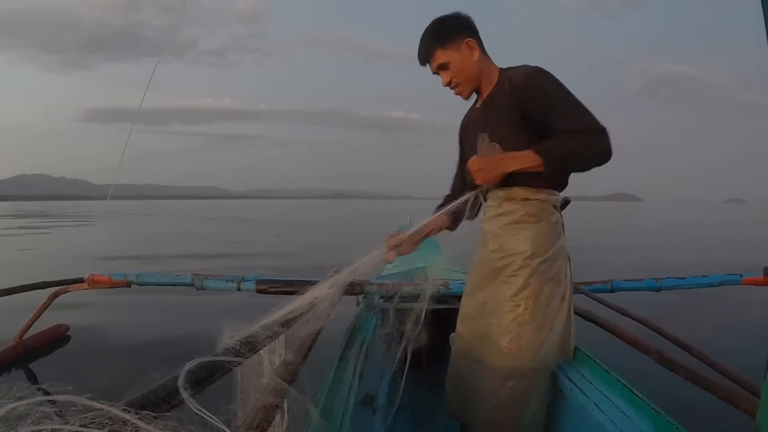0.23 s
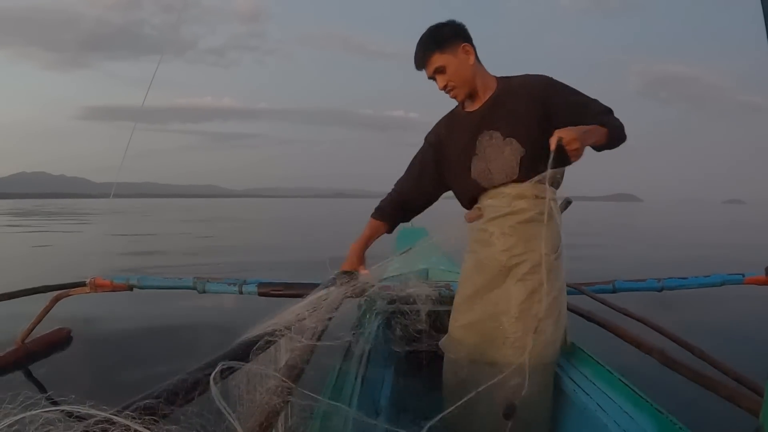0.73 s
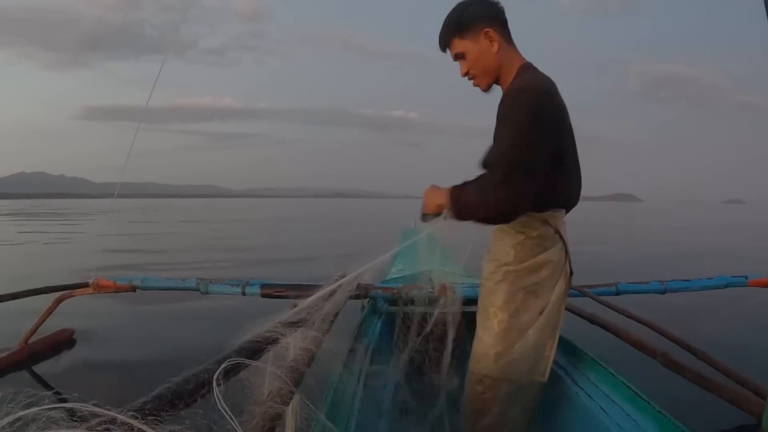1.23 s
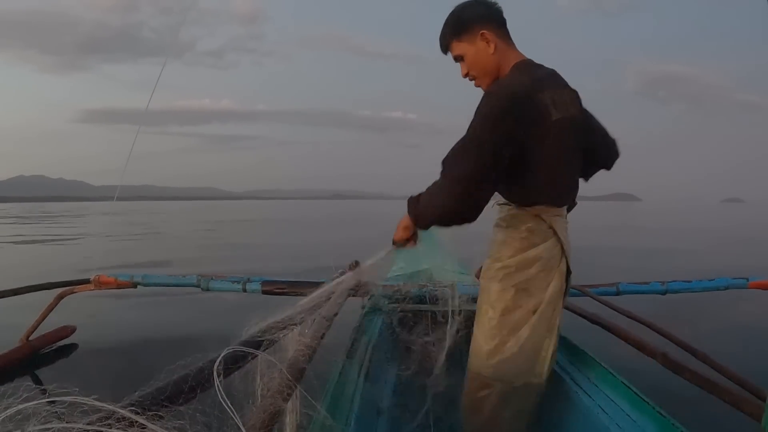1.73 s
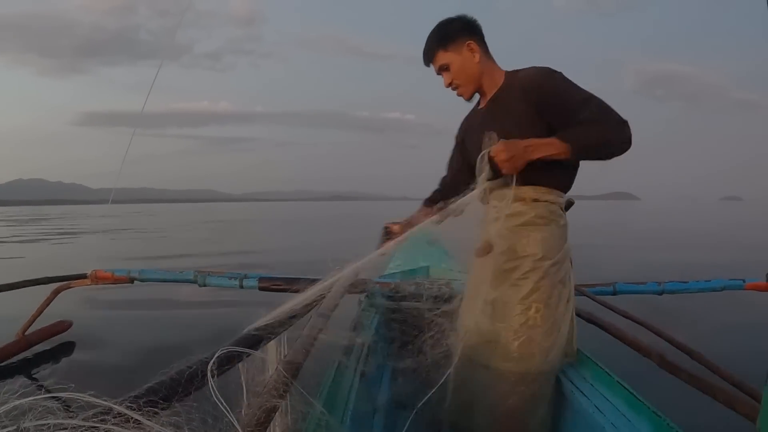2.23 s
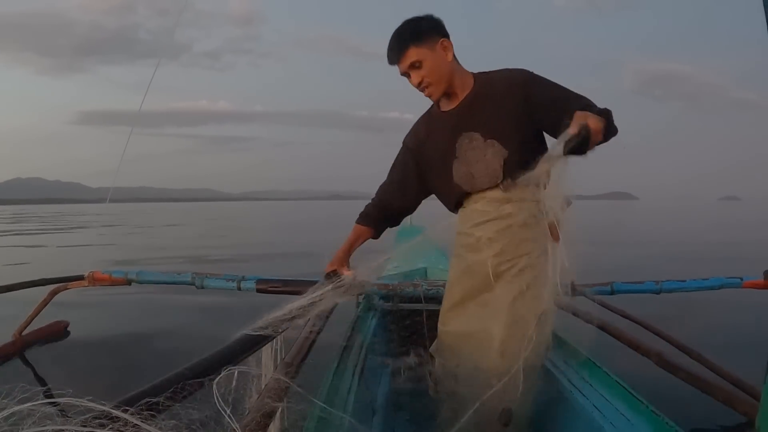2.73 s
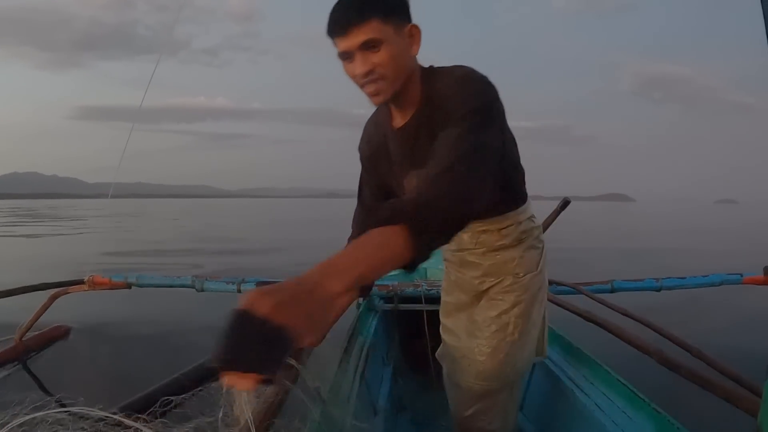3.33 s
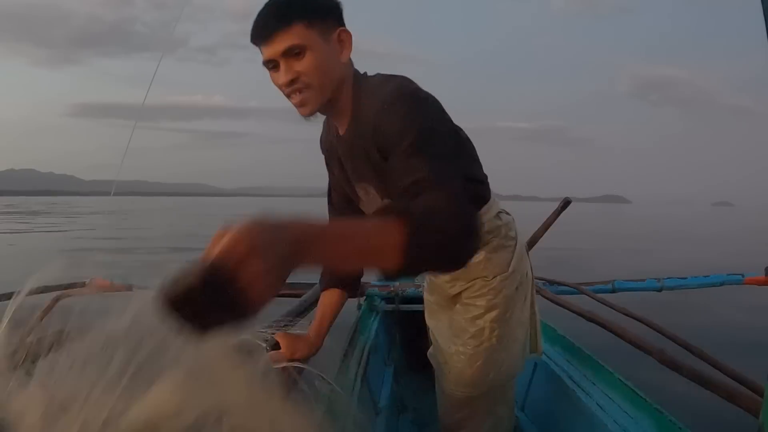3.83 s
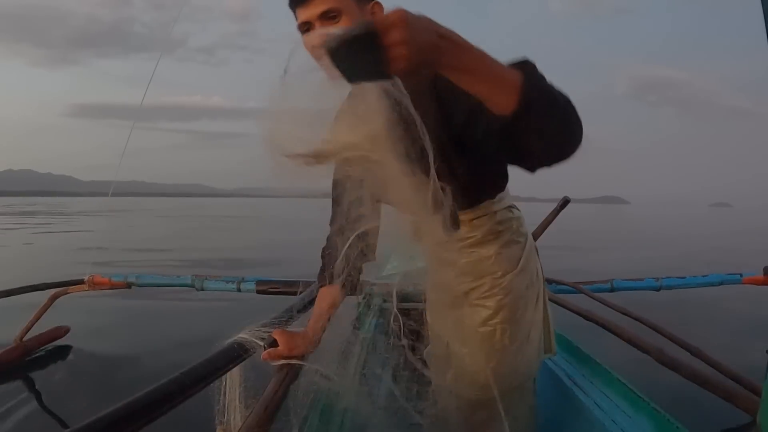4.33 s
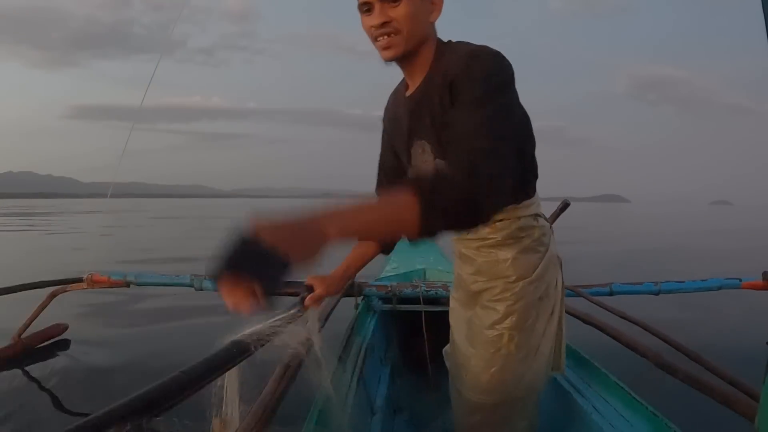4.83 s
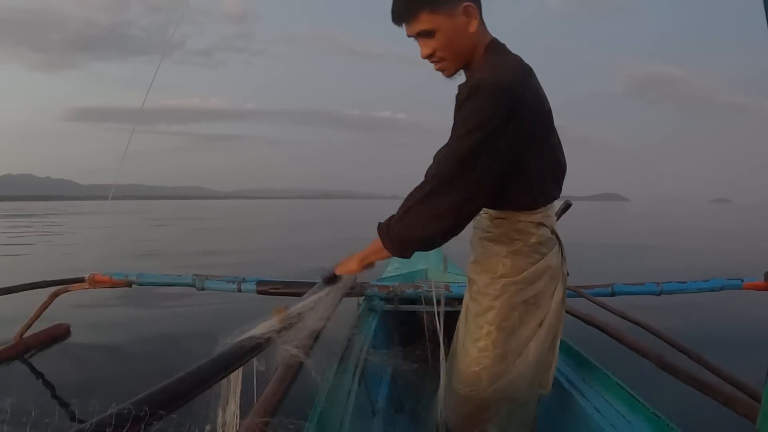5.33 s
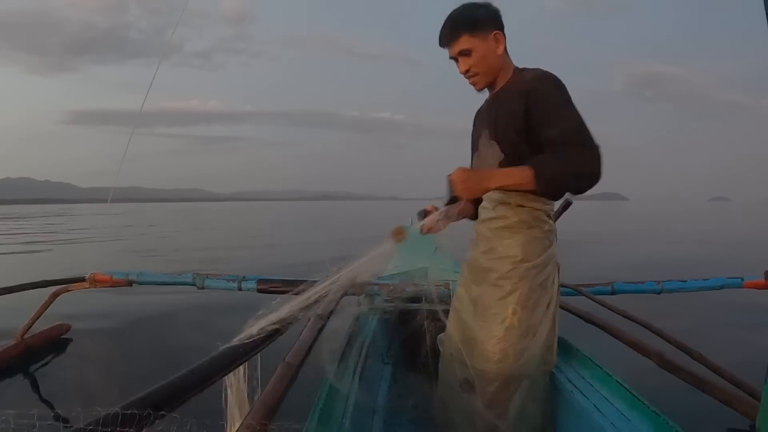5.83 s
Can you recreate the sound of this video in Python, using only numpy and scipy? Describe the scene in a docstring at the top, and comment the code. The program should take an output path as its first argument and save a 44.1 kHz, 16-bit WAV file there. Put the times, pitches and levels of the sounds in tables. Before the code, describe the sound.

Hand-hauled wet netting crackles and scrapes over a hollow hull, water trickling off it in tiny plinks. Early wooden knocks and a booming load give way to drips, rough little zips of taut strands and softer bumps. After a brief quiet lull, water runs again, the line judders over the side, and a bright splash of droplets meets a last knock. Outdoors, close microphone, central sound, dark rumble beneath.

```python
"""Hauling a wet net

A wet gill net is hauled hand over hand into a small wooden boat, over a low rumble of dark noise.
Filtered grains make the mesh rustle, drag and fizz; sprays, bubbles and short pings make the water.
Zips are rough bands of noise; knocks and thuds are noise bursts and tones that ring the hull's modes."""
import sys
import numpy as np
from scipy import signal
from scipy.fft import rfft, irfft, next_fast_len
from scipy.io import wavfile
from scipy.ndimage import uniform_filter1d

SR = 44100
rng = np.random.default_rng(int(sys.argv[2]) if len(sys.argv) > 2 else 0)


def transcribe(signal):
    """Save signal, clipped to [-1, 1], as a 16-bit WAV file at the path in sys.argv[1]."""
    frames = np.atleast_2d(signal).T
    limited = np.clip(frames, -1, 1)
    pcm = np.round(limited * 32767).astype(np.int16)
    wavfile.write(sys.argv[1], SR, pcm)


N = 268745
TIME = np.arange(N) / SR
AGE = TIME[:SR // 2]   # seconds since a contact


def from_db(db):
    """Level in dB to an amplitude factor."""
    return 10 ** (np.asarray(db) / 20)


def rms_one(x):
    """Scale to an rms of 1."""
    return x / np.sqrt(np.mean(x ** 2) + 1e-20)


def peak_one(x):
    """Scale to a peak of 1."""
    return x / (np.abs(x).max() + 1e-20)


def in_time(rows):
    """The columns of a curve table at every sample."""
    s, *columns = np.transpose(rows)
    return [np.interp(TIME, s, column) for column in columns]


def add(out, s, sound):
    """Mix a sound in at a time."""
    at = max(0, round(s * SR))
    out[at:at + len(sound)] += sound[:N - at]


def dying(t60):
    """Exponential decay that falls 60 dB in t60 seconds."""
    return from_db(-60 * AGE / t60)


def swell(length):
    """A quick rise and a longer fall, mostly over after the given length in seconds."""
    u = 4 * AGE / max(length, .001)
    return u * np.exp(1 - u)


def drift(rate):
    """Smooth chance with spread 1: random knots, rate of them per second, joined by lines."""
    knots = np.arange(int(N / SR * rate) + 2)
    return rms_one(np.interp(TIME * rate, knots, rng.standard_normal(len(knots))))


def coloured(x, spectrum, size=8192):
    """Causal (minimum-phase) filter with the given spectrum."""
    hz, db = np.transpose(spectrum)
    grid = np.maximum(np.arange(size // 2 + 1) * SR / size, 1)
    curve_db = np.interp(np.log(grid), np.log(hz), db)
    cepstrum = irfft(np.log(from_db(curve_db)))
    # fold the cepstrum forward in time to get minimum phase
    cepstrum[1:size // 2] *= 2
    cepstrum[size // 2 + 1:] = 0
    impulse = irfft(np.exp(rfft(cepstrum)))
    return signal.fftconvolve(x, impulse)[:len(x)]


def grains(per_s, spread_db):
    """Random clicks of uneven size; rms 1."""
    sizes = from_db(spread_db * np.minimum(rng.exponential(1, N), 4))
    signs = rng.choice([-1, 1], N)
    return rms_one(sizes * signs * (rng.random(N) < per_s / SR))


def pings(per_s, low_hz, high_hz, cycles, spread_db):
    """Short rings at random moments and pitches, of nearly equal strength; 60 dB down in so many cycles."""
    out, age = np.zeros(N), AGE[:SR // 20]
    for when, smallness, chance in rng.random((int(per_s * TIME[-1]), 3)):
        hz = low_hz * (high_hz / low_hz) ** smallness
        ping = np.sin(2 * np.pi * hz * age) * from_db(-60 * age * hz / cycles)
        add(out, when * TIME[-1], from_db(-spread_db * np.log(chance + .03)) * ping)
    return out


def patchy(x, depth_db, per_s, count=14):
    """Each third of an octave swells and sinks on its own, as different strands take their turn."""
    size = next_fast_len(N)
    spectrum = rfft(x, size)
    hz = np.maximum(np.arange(len(spectrum)) * SR / size, 1)
    place = np.clip(3 * np.log2(hz / 600), 0, count - 1)   # band number, counted up from 600 Hz
    out = np.zeros(N)
    for k in range(count):
        band = irfft(spectrum * np.maximum(1 - np.abs(place - k), 0), size)[:N]
        out += band * from_db(depth_db * drift(per_s))
    return rms_one(out)


# modes of the wooden hull: [f/Hz, level/dB, t60/s]
HULL_MODES = [(94.6, 1.5, 0.33), (235.2, 1, 0.34), (337.7, -8, 0.51), (476.7, -6, 0.27), (594, -5.5, 0.33),
              (717.6, 3.5, 0.31), (1091, -6, 0.1), (1155, 0.5, 0.26), (1398, 3.5, 0.14), (1530, -3, 0.13),
              (1999, 0, 0.12), (2427, -6, 0.1), (2946, -4, 0.15)]


def hull_ring(uneven_db=2.5):
    """The hull's answer to a tap; each spot excites the modes a little differently."""
    ring = np.zeros(len(AGE))
    for k, (hz, db, t60) in enumerate(HULL_MODES):
        strength = from_db(db + uneven_db * rng.standard_normal())
        ring += strength * (-1) ** k * np.sin(2 * np.pi * hz * AGE) * dying(t60)
    return ring


def through_hull(force):
    """The hull's modes ringing under a force."""
    return signal.fftconvolve(force, hull_ring())[:len(force)]


# swell of the low rumble, before trim: [t/s, level/dB]
RUMBLE_LEVEL = [(0.0, -40), (0.7, -43), (1.37, -35.5), (2.09, -38), (2.56, -44.5), (3.26, -38.5),
                (4.22, -43.5), (4.7, -41.5), (5.42, -38.5), (6.09, -42.5)]
# colour of the low rumble: [f/Hz, level/dB per Hz]
RUMBLE_COLOUR = [(12, -37), (25, -1), (45, -2.5), (70, 1), (94, 0), (125, -3), (160, -3.5), (218, -4),
                 (250, -21.5), (300, -22.5), (420, -29.5), (1500, -52)]


def rumble():
    """A dark, even rumble that swells and sinks slowly."""
    level_db, = in_time(RUMBLE_LEVEL)
    noise = rms_one(coloured(rng.standard_normal(N), RUMBLE_COLOUR))
    slow_power = uniform_filter1d(noise ** 2, SR // 8)
    even = noise / np.sqrt(slow_power)
    return from_db(level_db - 0.52) * even


# drops fall on the sea and trap a bubble, before tap and bubble are balanced: [t/s, level/dB, f/Hz]
DRIP_EVENTS = [(2.10, -42, 1790), (2.173, -38, 1240), (2.205, -41, 1296), (2.504, -42, 1630),
               (2.708, -38, 1580), (2.742, -48, 2300), (2.76, -41, 850), (2.778, -48, 2170),
               (3.531, -41.5, 2450), (4.105, -44, 1590), (4.227, -45, 490), (4.339, -45, 1230),
               (4.37, -41.5, 1880), (4.735, -43, 1180), (4.755, -44, 1330), (4.775, -43, 1920)]


def drips(t60=0.048, rise_per_s=4.8, onset_s=0.00035):
    """A tap on the surface, then a bubble whose pitch climbs as it rises."""
    out = np.zeros(N)
    for s, db, hz in DRIP_EVENTS:
        tone = np.sin(2 * np.pi * hz * AGE * (1 + rise_per_s * AGE / 2))
        bubble = tone * dying(t60) * (1 - np.exp(-AGE / onset_s))
        near_pitch = signal.butter(1, [.75 * hz, 1.4 * hz], "band", fs=SR, output="sos")
        burst = rng.standard_normal(len(AGE)) * dying(0.013)
        tap = peak_one(signal.sosfilt(near_pitch, burst))
        add(out, s, from_db(db) * (from_db(-1) * bubble + from_db(-4) * tap))
    return out


def trickle(water_db, rustle_db):
    """Tiny drops run off the mesh, larger ones plink on the sea, single strands tick as they pull free."""
    drops = pings(per_s=80, low_hz=2050, high_hz=6970, cycles=88, spread_db=1.0)
    plinks = pings(per_s=26, low_hz=913, high_hz=2740, cycles=96, spread_db=0.5)
    ticks = pings(per_s=70, low_hz=1290, high_hz=6000, cycles=16, spread_db=0.5)
    plink_db = np.minimum(water_db, -57) + 0.5   # plinks grow no louder in heavy runs of water
    return from_db(water_db - 5.5) * drops + from_db(plink_db) * plinks + from_db(rustle_db + 3) * ticks


# wet strands snap and spatter, before trim: [t/s, level/dB, length/s]
SPATTER_EVENTS = [(0.157, -39.5, 0.02), (0.4004, -38, 0.025), (1.348, -34.5, 0.02), (2.151, -38, 0.036),
                  (2.353, -35.5, .017), (2.672, -42.5, .02), (2.917, -41.5, .008), (3.317, -42, 0.011),
                  (4.316, -49.5, 0.018), (4.779, -41, 0.024), (4.894, -41, 0.024), (4.945, -36, 0.033),
                  (5.118, -37.5, 0.011), (5.1735, -30, .009), (5.311, -41, 0.012), (5.487, -36, 0.018),
                  (5.642, -42, .008), (5.793, -24.5, 0.0083)]
# colour of the flicked droplets: [f/Hz, level/dB per Hz]
SPRAY_COLOUR = [(600, -32), (1800, 14.5), (3000, 18), (6000, 17.5), (12000, 9.5), (16000, 3)]
FLICKS_PER_S, FLICK_DB = 13, 2.5   # lesser sprays at random, dB against the water's level before trim


def spatter(water_db):
    """Short sprays of droplets flicked off the strands: strong ones, and lesser ones that follow the water."""
    strong, lesser = np.zeros(N), np.zeros(N)
    droplets = rms_one(coloured(grains(9000, 2.5), SPRAY_COLOUR))
    for s, db, length in SPATTER_EVENTS:
        add(strong, s, from_db(db) * swell(length))
    for when, size in rng.random((int(FLICKS_PER_S * TIME[-1]), 2)):
        add(lesser, when * TIME[-1], from_db(FLICK_DB) * (.5 + size) * swell(0.011))
    return from_db(-7) * (strong + from_db(water_db) * lesser) * droplets


# taut strands zip over the side: [t/s, peak level/dB, f/Hz]
ZIP_EVENTS = [(2.865, -45, 1336), (3.01, -43, 6180), (3.169, -37, 1550), (3.320, -41, 4740),
              (3.67, -45, 3050), (4.586, -44.5, 2920), (4.894, -38, 5460), (4.948, -38, 3300),
              (5.135, -44, 1016)]


def zips(length=0.047, waver=0.34):
    """Knots slip past an edge at an uneven rate, which gives a rough band around one pitch."""
    out = np.zeros(N)
    for s, db, hz in ZIP_EVENTS:
        phase = 2 * np.pi * hz * AGE
        in_phase = drift(waver * hz)[:len(AGE)] * np.sin(phase)
        quadrature = drift(waver * hz)[:len(AGE)] * np.cos(phase)
        add(out, s, from_db(db) * peak_one((in_phase + quadrature) * swell(length)))
    return out


# the float line drags over the side: [t/s, level/dB]
GUNWALE_LEVEL = [(4.85, -72), (4.96, -58.5), (5.24, -50), (5.38, -54.5), (5.55, -66), (6.09, -76)]
# force of that drag: [f/Hz, level/dB per Hz]
GUNWALE_FORCE = [(200, -24), (590, 3.5), (720, 4), (900, -7.5), (2000, -1.5), (4000, -19)]


def gunwale():
    """The loaded line judders over the side of the boat and keeps the planks ringing."""
    level_db, = in_time(GUNWALE_LEVEL)
    slips = coloured(grains(500, 2.0) * from_db(2.7 * drift(50)), GUNWALE_FORCE)
    ringing = rms_one(through_hull(slips))
    return from_db(level_db) * rms_one(ringing + from_db(-2) * rms_one(slips))


# soft heavy loads land in the hull: [t/s, level/dB, length/s, brightness f/Hz, wet slap level/dB]
THUD_EVENTS = [(0.966, -41, 0.04, 630, -20), (1.162, -38.5, 0.036, 770, -20),
               (1.302, -27.5, 0.08, 280, -18), (1.321, -23, 0.08, 160, -39), (1.352, -36, 0.06, 600, -10),
               (1.51, -30, 0.066, 81, -26), (2.024, -34.5, 0.037, 151, -23),
               (3.191, -32, 0.075, 235, -15.5), (3.255, -29.5, 0.042, 120, -34),
               (3.421, -39, 0.042, 446, -5), (4.862, -44.5, 0.04, 600, -28), (5.199, -39, 0.074, 166, -16),
               (5.296, -46, 0.034, 900, -2), (5.357, -30, 0.031, 104, -17)]
# colour of struck planks, for wet slaps and knocks: [f/Hz, level/dB per Hz]
PLANK_COLOUR = [(100, -36), (300, -8.5), (650, 10), (1400, -3), (2500, -5), (5000, -13), (16000, -23)]


def thuds():
    """A heap lands: a wet slap, and a lumpy, dull push that sets the hull booming."""
    out = np.zeros(N)
    for s, db, length, bright_hz, slap_db in THUD_EVENTS:
        dull = signal.butter(3, bright_hz, fs=SR, output="sos")
        no_sub = signal.butter(2, 65, "high", fs=SR, output="sos")
        push = signal.sosfilt(np.vstack([dull, no_sub]), rng.standard_normal(len(AGE)) * swell(length))
        slap = coloured(rng.standard_normal(len(AGE)) * swell(0.039), PLANK_COLOUR)
        boom = rms_one(push) + from_db(-2) * rms_one(through_hull(push))
        thud = rms_one(boom + from_db(slap_db) * rms_one(slap))
        add(out, s, from_db(db) * thud * np.sqrt(length / AGE[-1]))   # a short thud carries less energy
    return out


# floats and sinkers hit the boat, often in quick clusters; levels before trim:
# [t/s, level/dB, f/Hz, crack level/dB, level passed into the hull/dB]
KNOCK_EVENTS = [(0.0262, -21.5, 2320, -2, -7), (0.0345, -25, 1480, 3, -10), (0.0532, -20.5, 2330, -1, -0.5),
                (0.122, -36, 1130, -14, 9.5), (0.496, -41.5, 1570, -4, 2), (1.139, -13, 1700, -6, -8),
                (1.279, -24, 1156, -6.5, 6.5), (1.2995, -17.5, 1804, -10, -2.5),
                (1.350, -24, 1080, -0.5, 2), (1.9755, -12, 1473, -1.5, 2), (1.999, -19, 1920, 2, -6),
                (2.683, -29, 1420, -8, -6), (3.198, -33, 1330, -14, 8), (3.4275, -29, 1100, -8, -7),
                (3.645, -45.5, 1110, 4, 9), (4.177, -39, 1320, -6, -3), (4.857, -27, 1684, -3.5, -5),
                (5.057, -32, 1350, -8, 2.5), (5.821, -20, 1155, 0.5, -2), (5.8245, -27, 906, 4, -8)]
# colour of the crack against wood: [f/Hz, level/dB per Hz]
CRACK_COLOUR = [(300, -7), (800, 5), (1400, 15.5), (2300, 10.5), (3500, 1), (6500, -12), (9000, -13.5),
                (16000, -36)]


def knocks(plank_t60=0.3, contact_s=0.00027, body_t60=0.044):
    """A hard little body rings briefly and cracks against the wood, which rings on."""
    out = np.zeros(N)
    contact = 1 - np.exp(-AGE / contact_s)
    for s, db, hz, crack_db, hull_db in KNOCK_EVENTS:
        tones = np.sin(2 * np.pi * hz * AGE) + .5 * np.sin(2 * np.pi * 1.3 * hz * AGE)
        body = peak_one(tones * dying(body_t60))
        burst = rng.standard_normal(len(AGE)) * (dying(.035) + .5 * dying(.005))
        crack = peak_one(coloured(burst, CRACK_COLOUR))
        planks = peak_one(coloured(rng.standard_normal(len(AGE)) * dying(plank_t60), PLANK_COLOUR))
        wood = peak_one(hull_ring()) + from_db(-4) * planks
        knock = from_db(-8.5) * body + from_db(crack_db) * crack + from_db(hull_db - 10.0) * wood
        add(out, s, from_db(db + 1) * contact * knock)
    return out


# each pull or sweep of an arm moves the net; levels before trim:
# [start t/s, build-up/s, length/s, water shed level/dB, strand rustle level/dB, plank drag level/dB]
ARM_PULLS = [(0.0, 0.01, 0.16, -54.5, -48.5, -49.5), (0.725, .085, 0.098, -60, -43, -48),
             (0.906, 0.066, 0.11, -52.5, -45.5, -46), (1.081, 0.042, 0.32, -56.5, -49.5, -48.5),
             (1.774, 0.089, 0.19, -55.5, -48, -54), (1.788, 0.034, 0.35, -52.5, -55, -51),
             (2.632, 0.056, 0.04, -74, -53, -52), (2.823, 0.048, 0.087, -56.5, -52, -46),
             (2.967, 0.13, 0.28, -51.5, -52.5, -60), (3.227, 0.064, 0.25, -56.5, -53, -49.5),
             (3.597, 0.036, 0.048, -66, -50.5, -50.5), (3.69, 0.047, 0.15, -57.5, -59, -81),
             (4.488, .05, 0.1, -62, -63, -82.5), (4.815, 0.04, 0.24, -52.5, -55, -62),
             (5.053, 0.066, 0.34, -73, -54, -52), (5.386, .05, 0.21, -59, -50.5, -60),
             (5.752, 0.029, 0.24, -53, -54, -55)]
# between pulls the net drains and shifts, and goes quiet while it is held up in the air; levels before trim:
# [t/s, draining water level/dB, shifting mesh level/dB]
IDLE_NET = [(0, -59, -57), (2.6, -60.5, -54.5), (3.75, -64, -59.5), (4.08, -72, -64), (4.26, -72.5, -70.5),
            (4.4, -62, -73), (4.75, -61.5, -64), (5.1, -51, -56.5), (6.09, -57, -54.5)]
# drag of the shifting mesh; it fades faster than the rustle as the net is lifted clear
IDLE_DRAG_DB, IDLE_TOUCH = -3, 1.87
PULL_RELEASE_S = 0.056   # the net slides to rest


def haul():
    """Levels in dB of water, strands and planks: every pull rises, holds and dies away over the idle net."""
    water_db, mesh_db = in_time(IDLE_NET)
    loudest_db = mesh_db.max()
    drag_db = loudest_db + IDLE_DRAG_DB + IDLE_TOUCH * (mesh_db - loudest_db)
    power = from_db([water_db, mesh_db, drag_db]) ** 2
    for s, build_up, length, *levels_db in ARM_PULLS:
        rise = np.clip((TIME - s) / build_up, 0, 1)
        fall = np.exp(-np.clip((TIME - s - length) / PULL_RELEASE_S, 0, 20))
        power = power + np.outer(from_db(levels_db), rise * fall) ** 2
    return 10 * np.log10(power)


# colour of water fizzing off the mesh: [f/Hz, level/dB per Hz]
HISS_COLOUR = [(1000, -39.5), (2200, 7), (3300, 4), (4500, 2), (7000, -1), (12000, -3.5), (16000, -2)]
# colour of crackling strands: [f/Hz, level/dB per Hz]
MESH_COLOUR = [(500, -25.5), (1000, -8), (1400, 3), (1900, 3), (2400, -1.5), (2900, -1.5), (4000, -16.5),
               (8000, -23.5), (16000, -55)]
# colour of knots rubbing over the planks: [f/Hz, level/dB per Hz]
DRAG_COLOUR = [(150, 10), (300, -1), (450, 6), (760, 0.5), (1000, -3.5), (1300, -3.5), (2000, -10.5),
               (4000, -8), (16000, -69)]


def net(hiss_db, rustle_db, drag_db):
    """Water fizzes off the mesh, wet strands crackle in clumps, and knots rub over the planks."""
    clumps = drift(40)   # the mesh catches and slips
    fizz = grains(900, 4.5) + from_db(2) * rng.standard_normal(N)
    fizz = coloured(fizz * from_db(1.2 * clumps + 0.7 * drift(70)), HISS_COLOUR)
    hiss = patchy(fizz, depth_db=2.2, per_s=55)
    strands = coloured(grains(1100, 2.8) * from_db(1.9 * clumps + 1.4 * drift(90)), MESH_COLOUR)
    crackle = patchy(strands, depth_db=3.0, per_s=60)
    rustle = rms_one(crackle + from_db(-10) * rms_one(through_hull(crackle)))
    rub = coloured(grains(2000, 1.64) * from_db(3.65 * drift(60)), DRAG_COLOUR)
    drag = rms_one(rms_one(rub) + from_db(-6) * rms_one(through_hull(rub)))
    return from_db(hiss_db + 1.47) * hiss + from_db(rustle_db - 2.26) * rustle + from_db(drag_db + 1.0) * drag


# level of the side signal before trim, faint in the mids and wider in the treble: [f/Hz, level/dB]
SIDE_LEVEL = [(100, -92), (300, -36), (2000, -39), (4500, -22.5), (7000, -17), (9000, -6), (16000, -8)]
SPRAY_LEFT_DB = -5   # the top of the spray is loudest on the left; before the side level above


def scene():
    """Everything lies straight ahead; the treble is wider than the rest, and the spray leans left."""
    water_db, rustle_db, drag_db = haul()
    spray = spatter(water_db)
    background = rumble() + drips() + trickle(water_db, rustle_db)
    contacts = zips() + gunwale() + thuds() + knocks()
    centre = background + contacts + net(water_db, rustle_db, drag_db)
    uneven = from_db(-5) * centre * drift(200)   # differs in sign from moment to moment
    side = coloured(uneven + from_db(SPRAY_LEFT_DB) * spray, SIDE_LEVEL)
    return np.array([centre + spray + side, centre + spray - side])


# the microphone is dull above 7 kHz, with a port resonance near 12 kHz: [f/Hz, level/dB]
MICROPHONE_COLOUR = [(6900, 0.5), (7400, -4), (8000, -15.5), (9100, -20.5), (10000, -15), (10900, -15),
                     (12300, 1), (13700, -10), (15200, -14)]
CUTOFF_HZ = 15600


def record(dry):
    """The microphone's colour, a right port that is duller at the very top, and the cut-off."""
    left, right = [coloured(channel, MICROPHONE_COLOUR) for channel in dry]
    top = np.convolve(right, signal.firwin(61, 11000, pass_zero=False, fs=SR), "same")
    pair = np.array([left, right - .52 * top])
    low_pass = signal.ellip(10, .1, 80, CUTOFF_HZ, fs=SR, output="sos")
    return signal.sosfilt(low_pass, pair)


dry = scene()
out = record(dry)
transcribe(out)
```